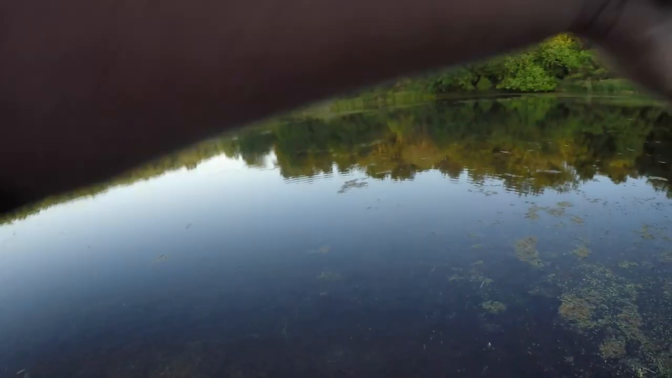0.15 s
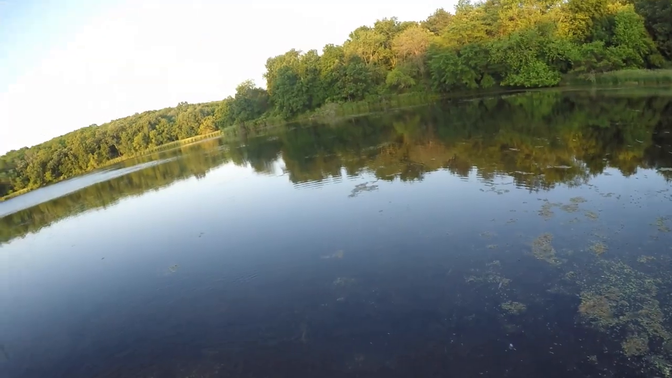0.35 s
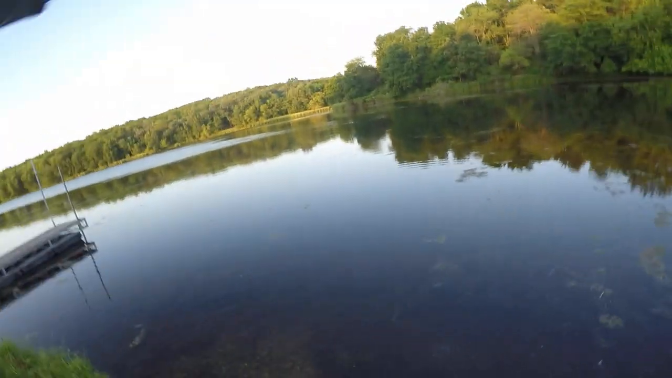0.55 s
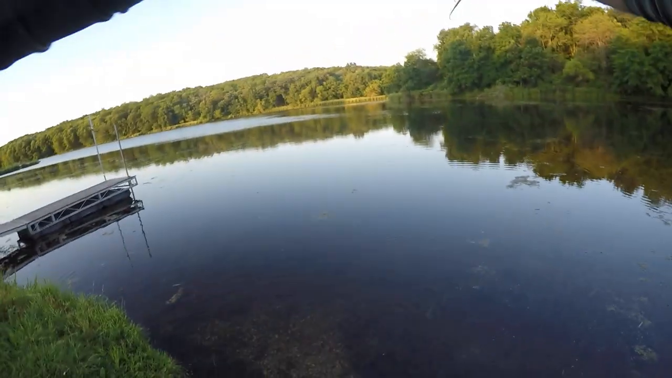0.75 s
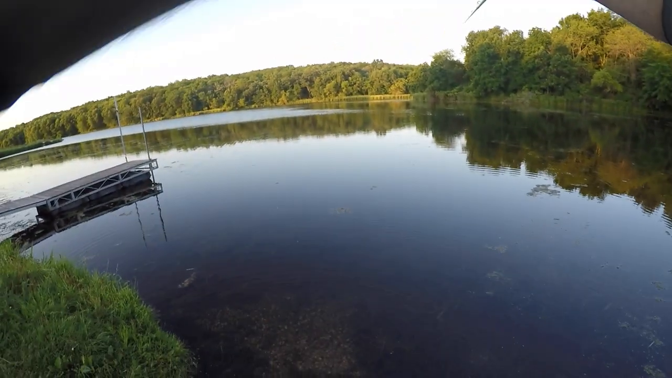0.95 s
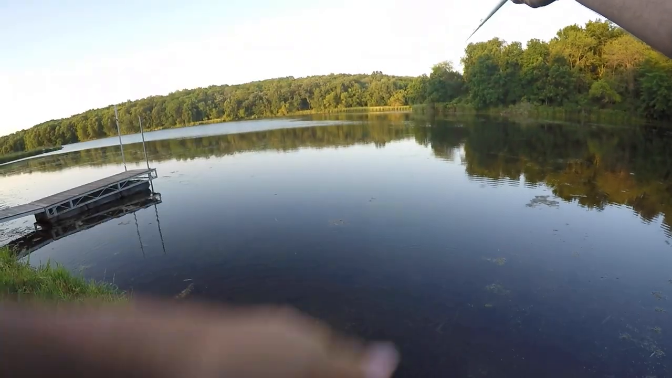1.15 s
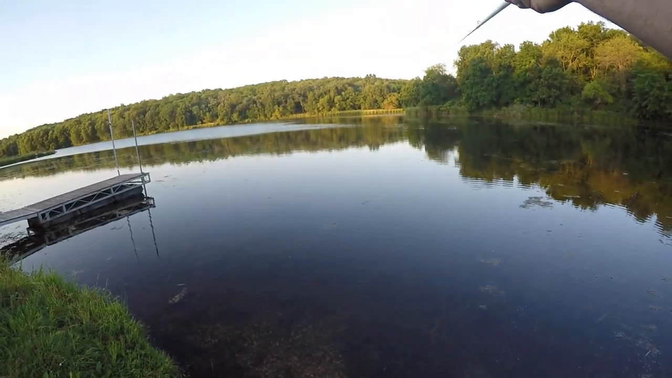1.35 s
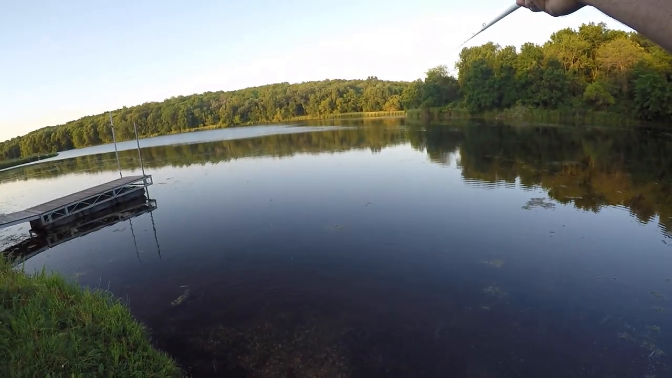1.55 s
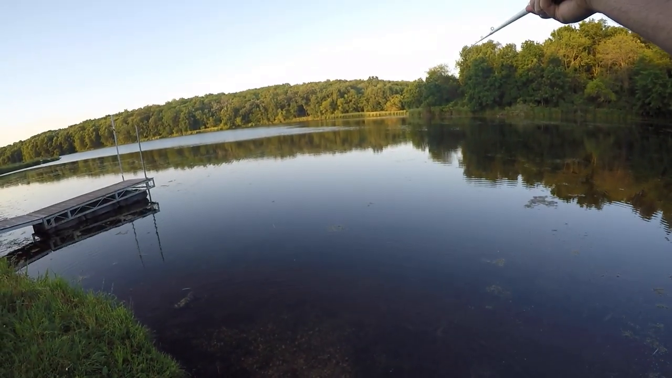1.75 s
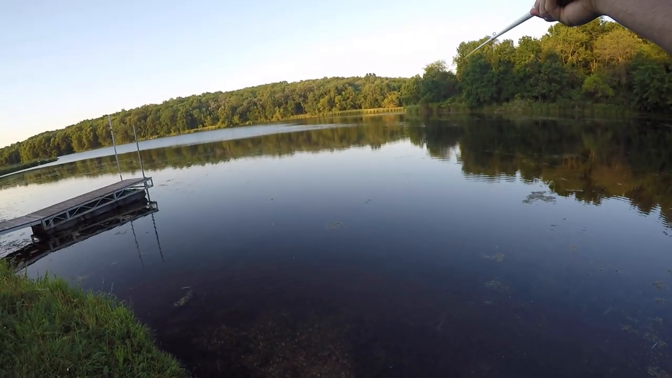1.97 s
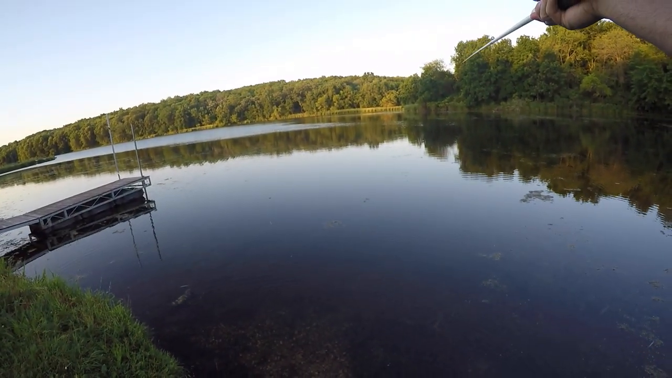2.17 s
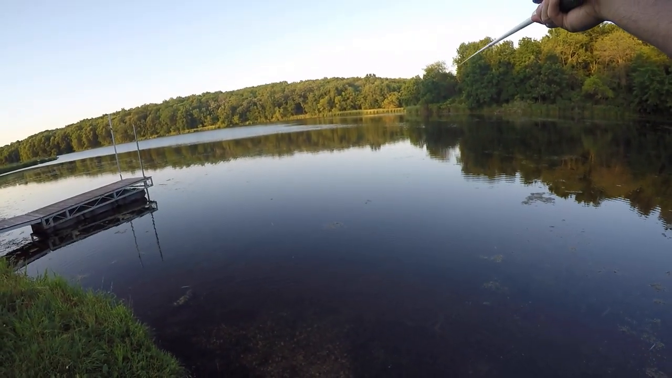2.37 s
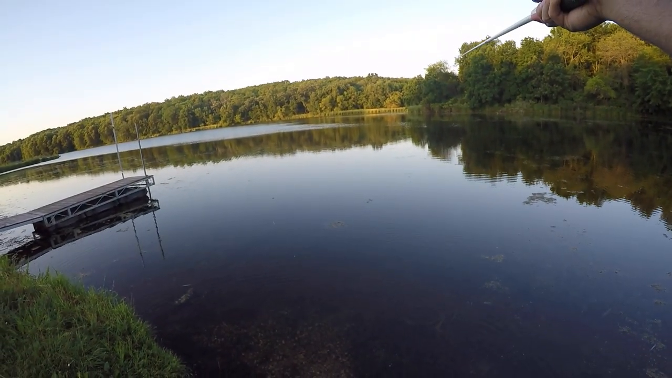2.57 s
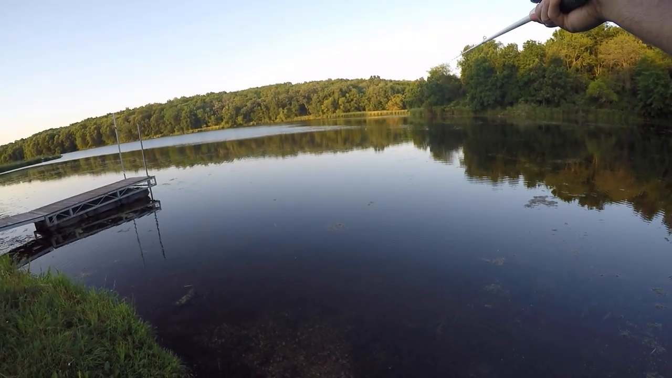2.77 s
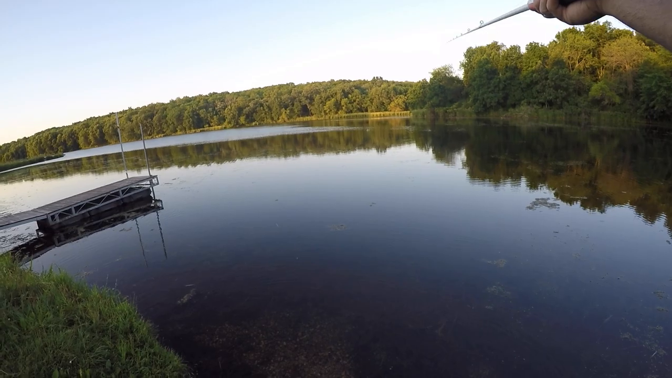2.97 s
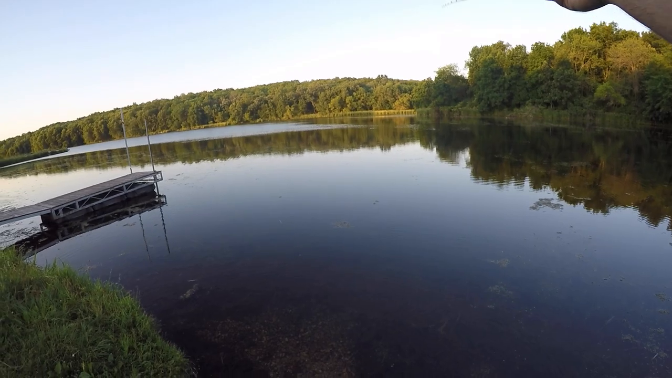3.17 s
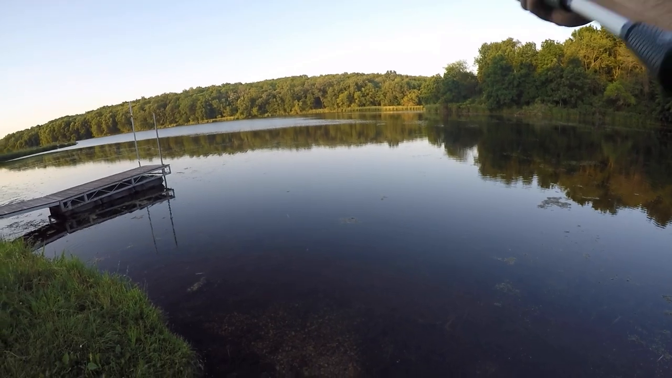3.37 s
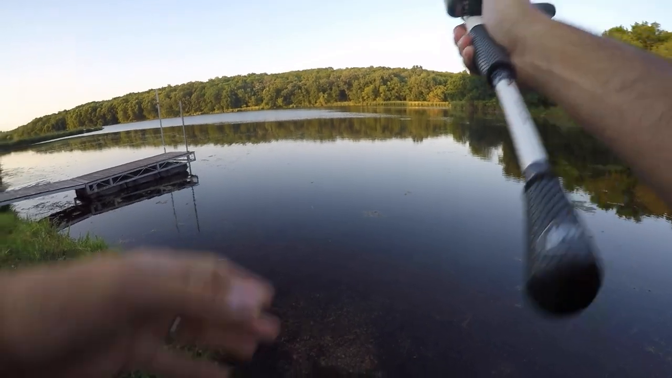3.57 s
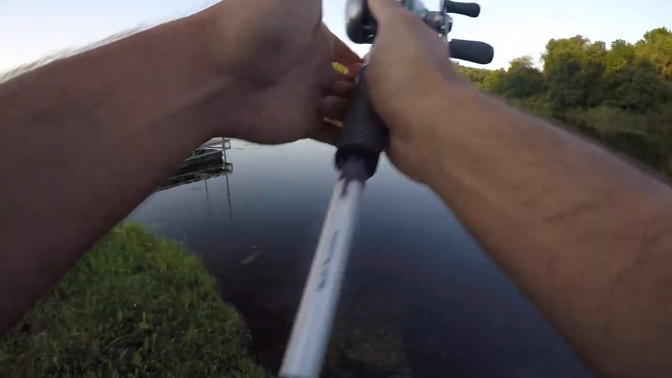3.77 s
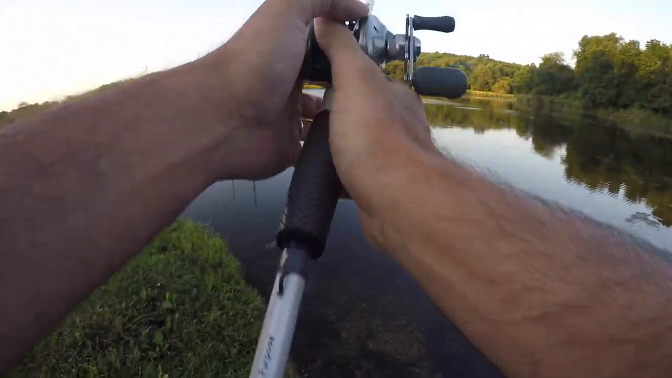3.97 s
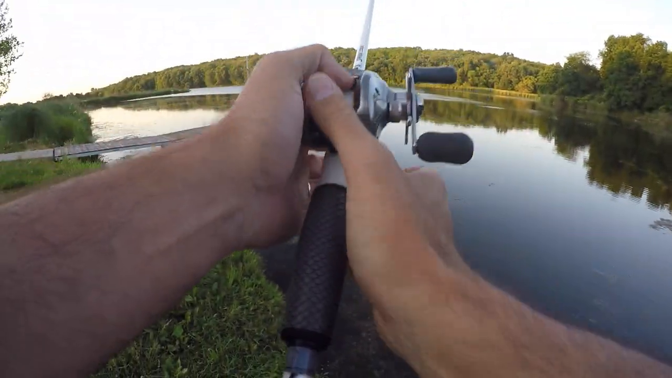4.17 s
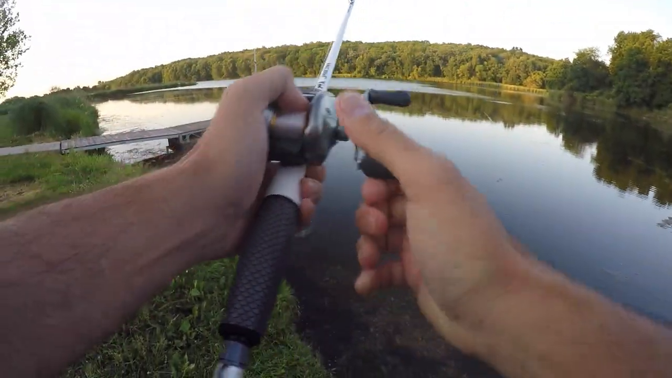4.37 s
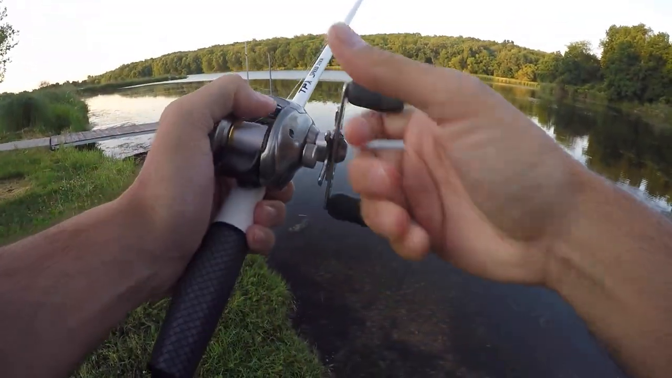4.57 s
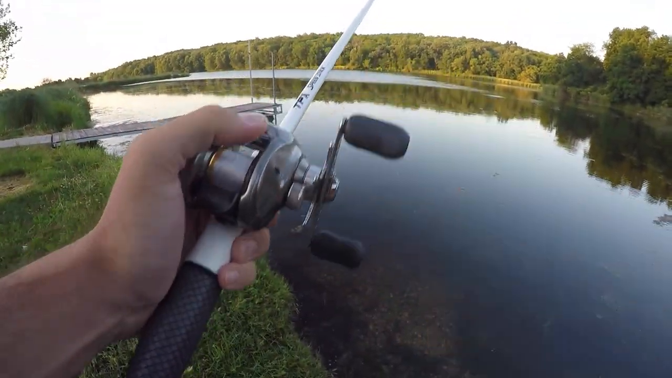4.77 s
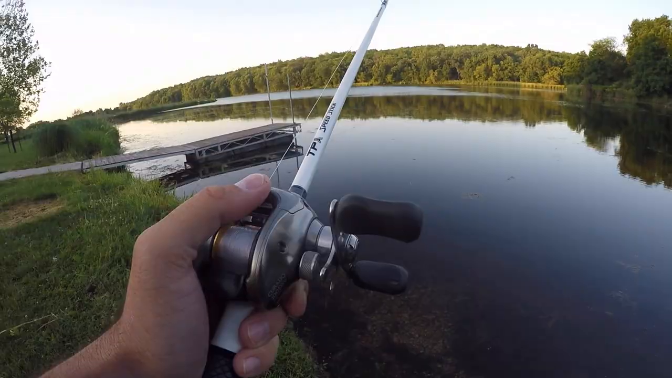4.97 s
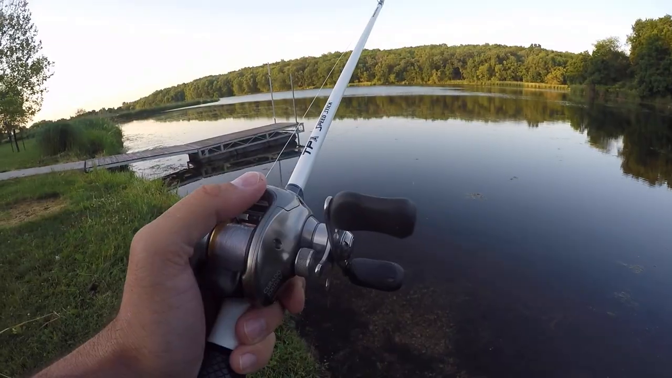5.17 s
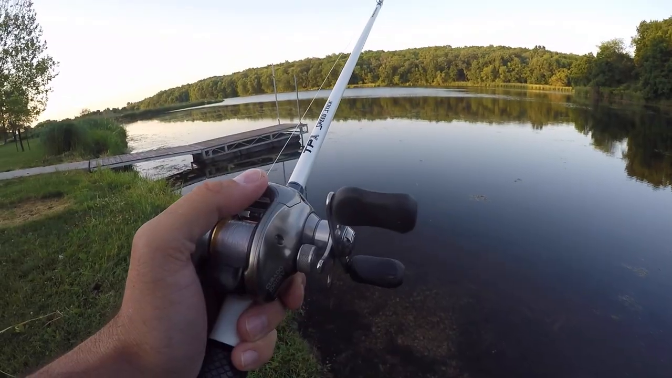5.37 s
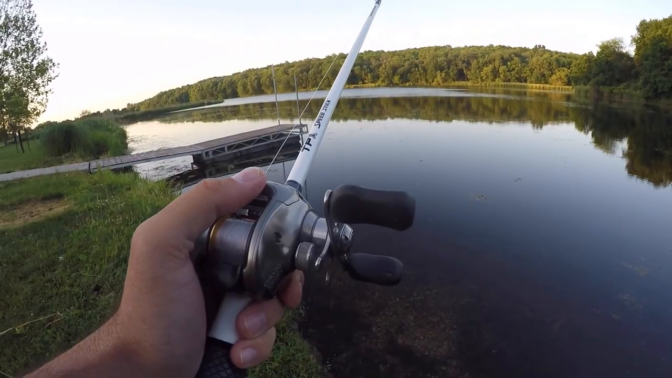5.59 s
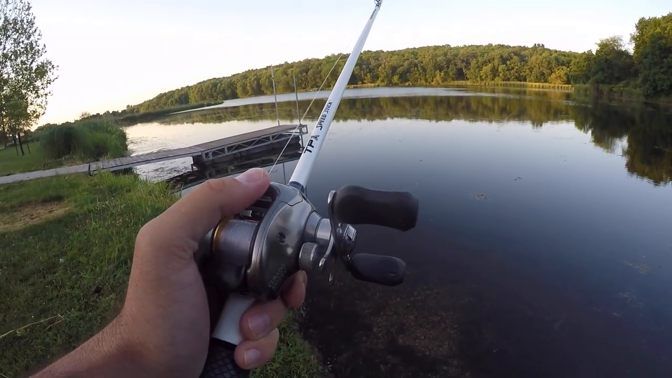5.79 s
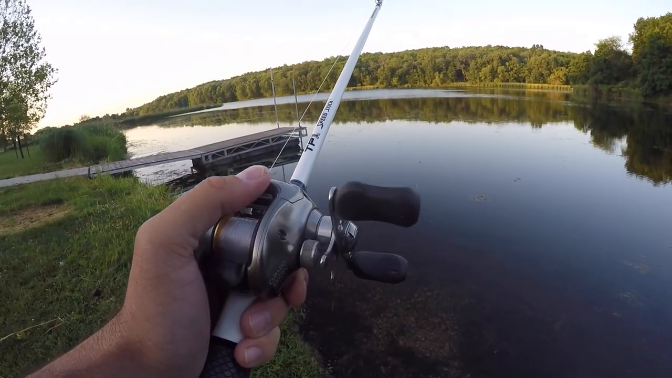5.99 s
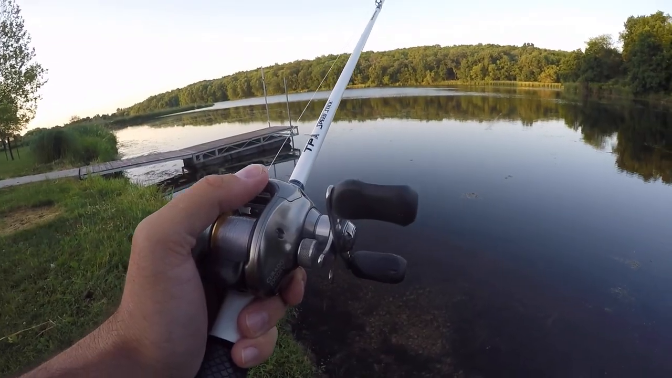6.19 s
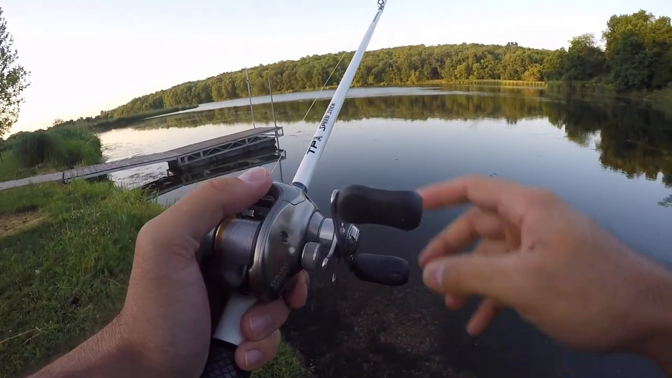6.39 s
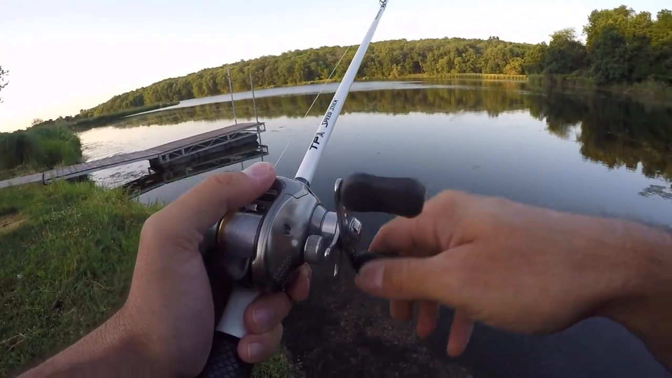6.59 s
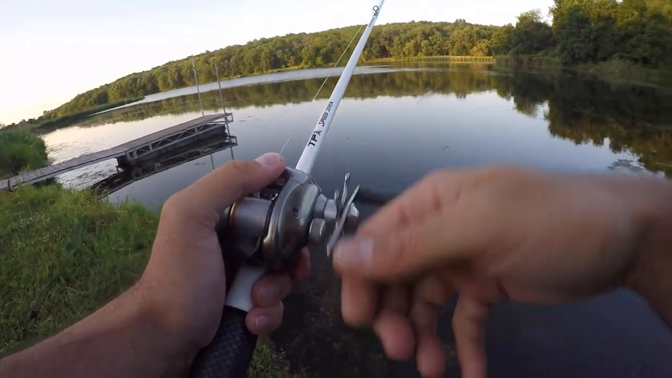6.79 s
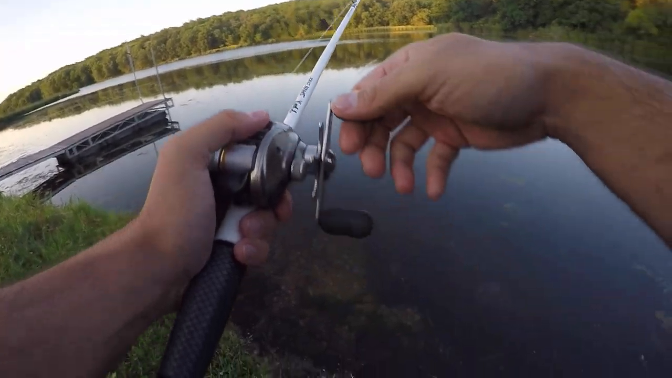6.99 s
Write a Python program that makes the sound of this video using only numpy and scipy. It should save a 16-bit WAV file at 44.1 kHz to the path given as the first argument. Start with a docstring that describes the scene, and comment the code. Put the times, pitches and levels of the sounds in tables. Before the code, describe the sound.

On a quiet lakeside, a fishing rod swishes through the air as a gust thumps the close microphone and the spool hums briefly, falling in pitch. Clothes rustle softly and gear ticks and knocks. Past the middle, the reel engages with one sharp metallic snap, followed by a few lighter clicks. Songbirds whistle, chirp and trill throughout over a faint breeze.

```python
"""On the grassy bank of a still lake, an angler casts. The rod swishes as it cuts the air, a gust from
the arm thumps the microphone, and the spool hums as it spins free. Clothes rustle, gear ticks and
knocks, and later the reel's clutch snaps in and rings its frame. Songbirds whistle, trill and buzz
from the trees across the water, over a light breeze and a soft hiss."""
import sys
import numpy as np
from scipy import signal
from scipy.fft import rfft, irfft
from scipy.io import wavfile

SR = 44100
rng = np.random.default_rng(int(sys.argv[2]) if len(sys.argv) > 2 else 0)


def put_to_file(sound):
    """Save the sound as 16-bit audio at rate SR, in the file named by the first command-line argument."""
    columns = np.atleast_2d(sound).T  # one column per channel
    safe = np.clip(columns, -1, 1)
    whole_steps = np.round(safe * 32767)
    wavfile.write(sys.argv[1], SR, whole_steps.astype(np.int16))


N = 310464


def amp(db):
    """Turn decibels into a gain."""
    return 10 ** (np.asarray(db) / 20)


def rms_one(x):
    """Scale a signal so its average strength (rms) is 1."""
    return x / np.sqrt(np.mean(x ** 2) + 1e-20)


def in_time(rows):
    """Join a table's points with straight lines: one curve for each column after the time."""
    times, *columns = np.transpose(rows)
    return [np.interp(np.arange(N) / SR, times, column) for column in columns]


def coloured(x, spectrum):
    """Shape lows and highs by (f/Hz, level/dB) points; the result has rms 1."""
    hz, db = np.transpose(spectrum)
    grid = np.maximum(np.arange(N // 2 + 1) * SR / N, 1)
    gain = amp(np.interp(np.log(grid), np.log(hz), db))
    return rms_one(irfft(rfft(x) * gain, N))


def filtered(x, hz, kind, order=2):
    """Keep the "low" side, the "high" side or a "band" of a sound."""
    return signal.sosfilt(signal.butter(order, hz, kind, fs=SR, output="sos"), x)


def drift(rate):
    """Wander around zero, heading for a new random value `rate` times a second."""
    return np.interp(np.arange(N) / SR * rate, np.arange(3000), rng.standard_normal(3000))


def ring(x, hz, t60):
    """Let x set a tone ringing, which dies away by 60 dB in t60 seconds."""
    decay, step = amp(-60 / (t60 * SR)), 2 * np.pi * hz / SR
    return signal.lfilter([0, np.sin(step)], [1, -2 * decay * np.cos(step), decay * decay], x + 1e-18)


def add(out, x, start):
    """Mix x into out at `start` seconds."""
    i = round(start * SR)
    out[i:i + len(x)] += x[:N - i]


def whistle(length, pitches_hz, edge):
    """A pure tone gliding unsteadily through the pitches; `edge` is the share spent fading in and out."""
    progress = np.linspace(0, 1, round(length * SR))
    glide = np.polyfit(np.linspace(0, 1, len(pitches_hz)), pitches_hz, len(pitches_hz) - 1)
    waver = .013 * np.interp(progress * length * 70, np.arange(40), rng.standard_normal(40))
    hz = np.polyval(glide, progress) * (1 + waver)
    return signal.windows.tukey(len(hz), min(edge, 1)) * np.sin(2 * np.pi * np.cumsum(hz) / SR)


# The background's lows and highs: f/Hz, level/dB
AIR_COLOUR = [(12, -23), (30, -3), (90, -3.5), (150, -9.5), (1070, -24.5), (1500, -20.5), (2700, -23),
              (4300, -30), (10200, -46.5), (14300, -37.5)]
def air():
    """Far trees, breeze and microphone hiss blend into one soft noise."""
    return amp(-52.5 + drift(4.5)) * coloured(rng.standard_normal(N), AIR_COLOUR)


def wind(gust_s=.515, hold_s=.097):
    """A breeze, and one gust from the casting arm, push on the microphone with a lumpy rumble."""
    colour = [(8, -13.5), (16, 4.5), (60, -11.5), (200, -30.5), (600, -36), (2000, -54.5)]
    lumps = coloured(rng.standard_normal(N), colour)
    t = np.arange(N) / SR - gust_s
    rise = amp(497 * np.minimum(t, 0))
    after = np.maximum(t - hold_s, 0)
    breeze, gust = amp(-52), amp(-19.5 - 600 * after)
    wake = amp(-30.5 - 77 * after)   # swirls that trail the gust
    return (breeze + rise * (gust + wake)) * amp(1.5 * drift(8.7)) * lumps


# Cloth and skin rubbing as the arms move: t/s, relative level/dB
RUB_LEVELS = [(0, -67.5), (.25, -66), (.46, -60), (.53, -52.5), (.65, -55), (.78, -60.5), (1.3, -71.5),
              (1.45, -59.5), (1.55, -73), (2.5, -81), (2.6, -72.5), (3.1, -74), (3.2, -78), (3.6, -65),
              (3.8, -70.5), (4.15, -71.5), (4.9, -66), (5.02, -80), (6.4, -78.5), (6.57, -69), (7.04, -67)]
# The rubbing's lows and highs: f/Hz, level/dB
RUB_COLOUR = [(500, 0.5), (1000, -4.5), (2000, -3.5), (4500, -3.5), (7000, -5), (10000, -13), (15500, -24)]
def rustle():
    """Fibres catch and let go, scattering tiny clicks over a smooth rubbing noise."""
    clicks_per_s = 370 * amp(4 * drift(12))   # they come in clumps
    clicks = rng.random((2, N)) < clicks_per_s / SR
    sizes = amp(7.5 * np.minimum(rng.exponential(1, (2, N)), 3))
    grains = clicks * sizes * rng.choice([-1, 1], (2, N))
    dull, bright = filtered(grains[0], [3500, 9000], "band"), filtered(grains[1], 7000, "high")
    catches = amp(2.2 * drift(60) + 2.5 * drift(14))
    rub = .51 * rms_one(dull + bright) + rng.standard_normal(N)
    return amp(in_time(RUB_LEVELS)[0] + 15.5) * catches * coloured(rub, RUB_COLOUR)


# Ways a note bends: shape name -> share of the bend as the note runs from 0 to 1
BENDS = {"slide": lambda u: u - .5, "hook": lambda u: np.exp(-u / .22),
         "arch": lambda u: -(2 * u - 1) ** 2}
# Whistled notes: t/s, length/s, f/Hz, bend/semitones, level/dB, shape name
BIRD_NOTES = [(0, 0.069, 2474, 2.5, -43, "slide"), (0.116, 0.078, 2705, 1.5, -46.5, "arch"),
              (0.25, 0.16, 2758, -1, -43, "slide"), (0.78, .1, 2463, -2.5, -44.5, "slide"),
              (0.978, 0.13, 2540, -3.5, -42.5, "slide"), (1.439, 0.06, 2630, -7.5, -43.5, "slide"),
              (1.574, 0.031, 2390, -7, -42.5, "slide"), (1.629, 0.074, 2570, 2.5, -45.5, "slide"),
              (1.867, 0.1, 3650, 0.8, -46.5, "slide"), (2.086, 0.069, 2586, 0.5, -40, "slide"),
              (2.301, 0.097, 2550, 3, -41, "slide"), (2.567, 0.16, 2738, 1.1, -46.5, "slide"),
              (2.877, 0.079, 2895, 3, -45, "hook"), (3.09, 0.037, 3700, -7, -51, "slide"),
              (3.166, 0.069, 2670, 2, -46, "arch"), (3.245, 0.081, 3064, -3, -46.5, "hook"),
              (3.32, 0.036, 2410, 1, -47, "slide"), (3.795, 0.049, 2670, 1.5, -47.5, "arch"),
              (3.831, 0.064, 2660, 2.5, -46, "arch"), (3.739, 0.084, 5340, 0, -51, "arch"),
              (3.95, 0.084, 2510, 5.5, -49.5, "hook"), (4.383, 0.17, 2846, 0.5, -46, "slide"),
              (4.56, 0.064, 3480, -3, -55, "slide"), (4.902, 0.057, 4600, -5.5, -53, "slide"),
              (4.675, 0.17, 2647, 4.5, -43.5, "hook"), (4.933, 0.0515, 2900, -2.5, -41, "slide"),
              (5.04, 0.16, 3020, 0.2, -47.5, "slide"), (5.285, 0.041, 2690, -2, -44.5, "slide"),
              (5.462, 0.15, 2622, -3, -47, "slide"), (5.684, 0.12, 2513, -2.5, -43.5, "slide"),
              (5.924, 0.096, 2306, 5, -45.5, "hook"), (6.053, 0.048, 3870, -8.5, -42, "hook"),
              (6.207, 0.16, 2644, -0.7, -41, "slide"), (6.335, 0.048, 2810, 7, -43, "hook"),
              (6.375, 0.11, 2440, 2, -48, "slide"), (6.778, 0.062, 3184, 0.5, -40, "slide"),
              (6.842, 0.056, 2857, 0.5, -36.5, "hook")]
def bird_notes():
    """Several birds whistle short notes that slide, hook or arch in pitch."""
    out = np.zeros(N)
    for start, length, hz, bend, db, shape in BIRD_NOTES:
        semitones = bend * BENDS[shape](np.linspace(0, 1, 6))
        add(out, amp(db) * whistle(length, hz * 2 ** (semitones / 12), edge=.035 / length), start)
    return out


def twitter():
    """Small, far birds chirp at random moments, mostly falling in pitch."""
    out = np.zeros(N)
    for when, pitch, glide, size in rng.random((190, 4)):
        first_hz = 2400 * 1.9 ** pitch
        pitches_hz = first_hz * (.6 + .6 * glide) ** np.array([0, .5, 1])
        add(out, amp(-63 + 8 * size) * whistle(.03, pitches_hz, edge=.8), when * 6.9)
    return out


def across_water(song, echo_s=.45):
    """Moving air makes birdsong flutter, and the trees send back a blurred echo."""
    song = song * amp(2 * drift(40) + 3.5 * drift(160))
    t = np.arange(SR) / SR
    echo = rng.standard_normal(SR) * amp(-60 * t / echo_s) * (t > .006)
    echo = filtered(echo, 6000, "low", order=1)   # leaves swallow the treble
    return song + amp(-10) * signal.fftconvolve(song, echo / np.linalg.norm(echo))[:N]


# Rod and line cutting the air: t/s, f/Hz, level/dB
ROD_SWING = [(.18, 394, -64), (.3, 427, -47), (.45, 380, -68), (.61, 720, -46), (.64, 966, -21),
             (.655, 948, -41), (.672, 914, -31), (.708, 668, -40), (.74, 600, -52), (.79, 548, -49),
             (.855, 480, -43.5), (.91, 430, -68)]
def swish():
    """Swirls of air peel off the rod in a breathy tone: the faster the swing, the higher it is."""
    hz, db = in_time(ROD_SWING)
    swirls = filtered(rng.standard_normal((2, N)), 32, "low")
    phase = 2 * np.pi * np.cumsum(hz) / SR
    sounding = np.arange(N) < ROD_SWING[-1][0] * SR
    return amp(db) * sounding * rms_one(swirls[0] * np.cos(phase) + swirls[1] * np.sin(phase))


# Short hisses: t/s, length/s, low f/Hz, high f/Hz, level/dB
HISS_BANDS = [(.49, .1, 3000, 11000, -39), (.585, .08, 4000, 15000, -41), (.595, .06, 1100, 2800, -37),
              (6.5, .14, 400, 1700, -50), (6.69, .1, 400, 1700, -50)]
def hisses():
    """Grainy noise swells and fades as line and rod tip whip, and later as a palm slides on the handle."""
    out = np.zeros(N)
    for start, length, low_hz, high_hz, db in HISS_BANDS:
        n = round(length * SR)
        noise = rng.standard_normal(SR // 4)[:n] * amp(1.5 * drift(330)[:n])
        band = filtered(noise, [low_hz, high_hz], "band")
        add(out, amp(db) * signal.windows.hann(n) * rms_one(band), start)
    return out


# The spool's tones: multiple of the turning rate, relative level/dB
SPOOL_TONES = [(1, 9.5), (6, 2)]
def spool(release_s=.68, run_s=.63):
    """The freed spool slows down; its off-centre weight hums and its brake magnets sing higher up."""
    t = np.arange(N) / SR - release_s
    turns_per_s = (284.6 - 207 * t) * (1 + .04 * drift(120))
    phase = 2 * np.pi * np.cumsum(turns_per_s) / SR
    hum = sum(amp(db + 4.5 * drift(60)) * np.sin(multiple * phase) for multiple, db in SPOOL_TONES)
    sounding = np.clip(t / .015, 0, 1) * np.clip((run_s - t) / .11, 0, 1)
    return amp(-57.5 - 26 * t) * sounding * hum


# One chirp of a trill: length/s, first f/Hz, middle f/Hz, last f/Hz
CHIRP = (.021, 7830, 5860, 4270)
# Runs of that chirp: t/s, first spacing/s, number of chirps
TRILL_RUNS = [(1.0207, .04592, 31), (4.9773, .04664, 25)]
# How loud the trilling is: t/s, level/dB
TRILL_LOUDNESS = [(1.0, -53), (1.6, -46), (2.0, -50), (2.44, -44), (4.97, -40), (5.64, -38), (6.12, -45)]
def trills():
    """One bird repeats a falling chirp very fast, slowing a little as it goes."""
    out, db = np.zeros(N), in_time(TRILL_LOUDNESS)[0]
    chirp = whistle(CHIRP[0], CHIRP[1:], edge=1)
    for first, spacing, count in TRILL_RUNS:
        for k in range(count):
            start = first + spacing * k * (1 + .0009 * k)
            add(out, amp(db[round(start * SR)]) * chirp, start)
    return out


# Small dry ticks: t/s, level/dB
GEAR_TICKS = [(1.1098, -35), (1.149, -24.5), (2.579, -27), (2.88, -29), (3.006, -33), (3.605, -29),
              (4.2936, -34), (6.6812, -30)]
def ticks():
    """Reel parts and gear tick, each with a bright crack of about a millisecond."""
    out = np.zeros(N)
    for start, db in GEAR_TICKS:
        crack = rng.standard_normal(200) * amp(-60 * np.arange(200) / SR / .0046)
        add(out, amp(db) * crack / abs(crack).max(), start)
    return filtered(out, [3500, 11000], "band")


# One long bird note: t/s, length/s, f/Hz, pulse rate/Hz, level/dB
LONG_NOTE = (1.559, .51, 2755, 32, -46)
def pulsed_note():
    """A bird holds one pitch while its loudness pulses quickly."""
    out = np.zeros(N)
    start, length, hz, rate, db = LONG_NOTE
    note = whistle(length, [hz] * 3, edge=.035 / length)
    pulses = np.sin(np.pi * rate * np.arange(len(note)) / SR) ** 2
    add(out, amp(db) * note * pulses, start)
    return out


# Knocks with a pitch: t/s, level/dB, f/Hz
PITCHED_KNOCKS = [(1.642, -38, 457), (2.112, -41, 746), (2.944, -31.5, 566), (2.953, -31.5, 1430),
                  (3.849, -25.5, 3050), (4.197, -30, 3630), (4.398, -30, 4260), (4.545, -20, 4150),
                  (4.803, -25, 3180), (6.593, -31, 1120)]
def knocks(cycles=15):
    """Each knock is a burst of noise that sets a body ringing for a few vibrations."""
    out = np.zeros(N)
    for start, db, hz in PITCHED_KNOCKS:
        burst = rng.standard_normal(900) * amp(-60 * np.arange(900) / SR * hz / cycles)
        body = ring(burst, hz, cycles / hz)
        knock = body / abs(body).max() + .037 * burst / abs(burst).max()
        add(out, amp(db) * filtered(knock, hz / 2, "high"), start)
    return out


# Rows of chirps: first t/s, last t/s, count, length/s, first f/Hz, middle f/Hz, last f/Hz, level/dB
CHIRP_ROWS = [(2.65, 2.868, 8, .018, 4400, 3850, 3550, -56), (4.412, 4.8, 4, .026, 3600, 4500, 5350, -53),
              (5.415, 5.805, 4, .024, 3500, 4350, 5000, -51), (4.05, 4.285, 3, .035, 5300, 4200, 3400, -53),
              (4.315, 4.695, 3, .075, 8700, 7600, 6850, -56), (5.065, 5.3, 3, .03, 5000, 4000, 3400, -52),
              (5.345, 5.862, 5, .022, 3600, 3150, 2750, -48),
              (6.005, 6.757, 6, .018, 3950, 3250, 2750, -46)]
def repeated_chirps():
    """Farther birds each repeat a gliding chirp at an even pace."""
    out = np.zeros(N)
    for first, last, count, length, *pitches_hz, db in CHIRP_ROWS:
        for start in np.linspace(first, last, count):
            add(out, amp(db) * whistle(length, pitches_hz, edge=.41), start)
    return out


# Hoarse calls: t/s, length/s, first f/Hz, last f/Hz, noise width/Hz, level/dB
BIRD_BUZZES = [(4.335, .04, 3300, 3200, 400, -49), (5.76, 0.33, 7400, 7540, 505, -61.5),
               (6.081, 0.084, 3570, 3580, 350, -48.5)]
def buzzes():
    """Small birds buzz: a gliding tone is roughened by noise into a rasp."""
    out = np.zeros(N)
    noises = rng.standard_normal((len(BIRD_BUZZES), SR // 2))
    for (start, length, first_hz, last_hz, width_hz, db), noise in zip(BIRD_BUZZES, noises):
        tone = whistle(length, (first_hz, np.sqrt(first_hz * last_hz), last_hz), edge=.5)
        rasp = rms_one(filtered(noise, width_hz, "low"))
        add(out, amp(db) * tone * rasp[:len(tone)], start)
    return out


# The clutch's catch, spring, main blow and bounces: t/s, level/dB, contact length/s, lowest f/Hz
CLUTCH_HITS = [(4.4321, -14, .0018, 2500), (4.4413, -19, .002, 6000), (4.4472, 0, .004, 300),
               (4.4522, -11, .002, 300), (4.4558, -16, .003, 300), (4.465, -21, .005, 300)]
# Clusters of tones the reel's frame rings with: f/Hz, level/dB, time to fade by 60 dB/s
FRAME_TONES = [(400, -35, 0.18), (940, -26, 0.08), (1900, -29.5, 0.11), (2810, -28, 0.035),
               (3570, -11, 0.022), (4960, -8, 0.0056), (7030, -16, 0.01), (9325, -12.5, 0.013),
               (12350, -26, 0.0072)]
def clutch():
    """Each hit chatters briefly and rings the frame; light parts stir mainly its high tones."""
    out = np.zeros(N)
    scatter = .0236 * rng.standard_normal((len(FRAME_TONES), 8))
    clusters = np.exp(np.linspace(-.13, .13, 8) + scatter)   # eight close pitches each
    for start, db, length, low_hz in CLUTCH_HITS:
        touching = np.arange(400) < length * SR
        chatter = np.zeros(SR // 6)
        chatter[:400] = np.sign(rng.standard_normal(400)) * touching / np.sqrt(length * SR)
        chatter = filtered(chatter, low_hz, "high")
        for (hz, tone_db, t60), ratios in zip(FRAME_TONES, clusters):
            ringing = sum(ring(chatter, hz * ratio, t60) for ratio in ratios)
            ringing = filtered(ringing, .75 * hz, "high")   # a small frame gives off little bass
            add(out, amp(db + tone_db) * ringing, start)
    return out


def scene():
    """The background, the angler, the birds and the wind meet at one microphone."""
    background = air()
    angler = rustle() + swish() + spool() + hisses() + ticks() + knocks() + clutch()
    song = buzzes() + bird_notes() + pulsed_note() + trills() + repeated_chirps() + twitter()
    return (background + angler + across_water(song) + wind())[None]


def record(dry, cutoff_hz=15300):
    """Flatten any peak that is too loud, then cut the highest treble."""
    treble_cut = signal.ellip(12, .5, 85, cutoff_hz, fs=SR, output="sos")
    return signal.sosfilt(treble_cut, np.clip(dry, -.9, .9))


dry = scene()
out = record(dry)
put_to_file(out)
```